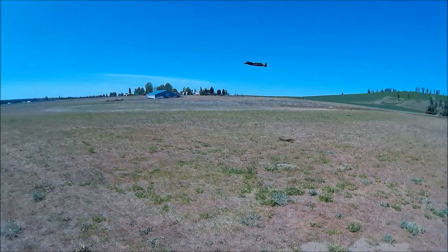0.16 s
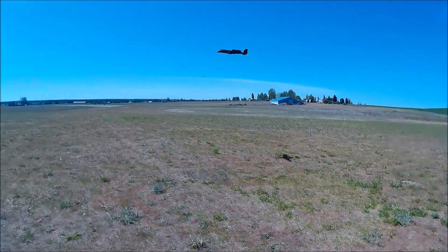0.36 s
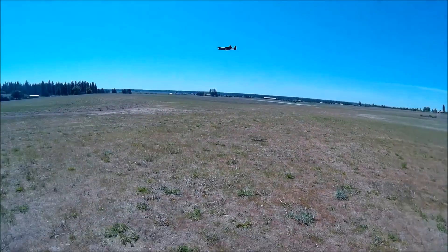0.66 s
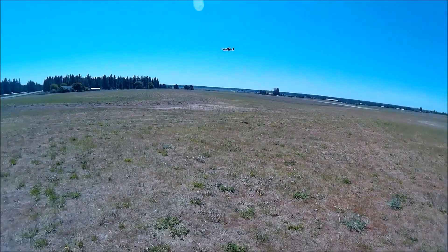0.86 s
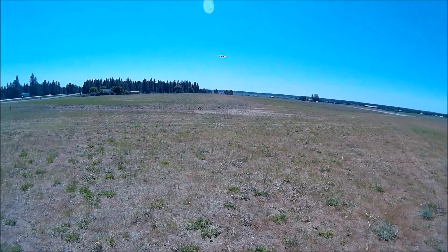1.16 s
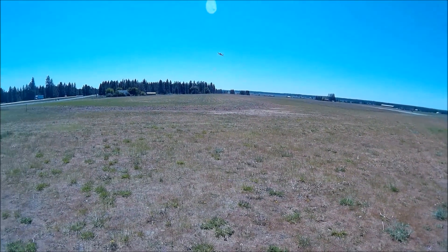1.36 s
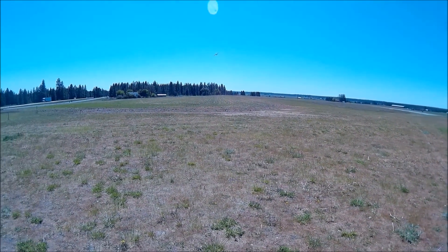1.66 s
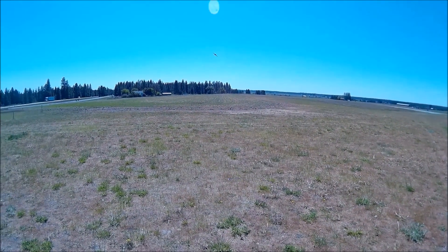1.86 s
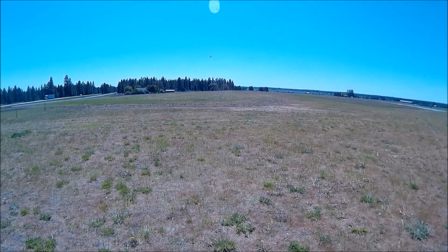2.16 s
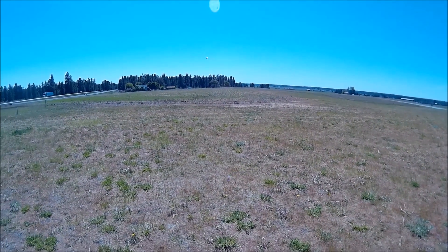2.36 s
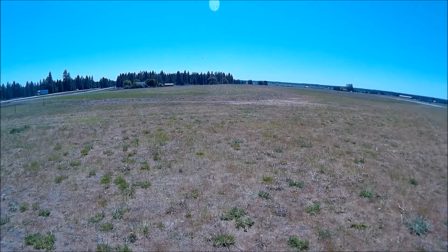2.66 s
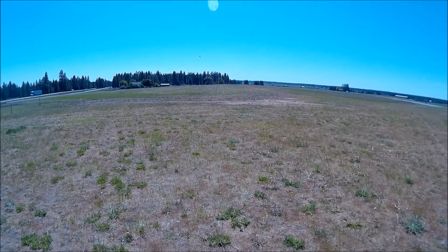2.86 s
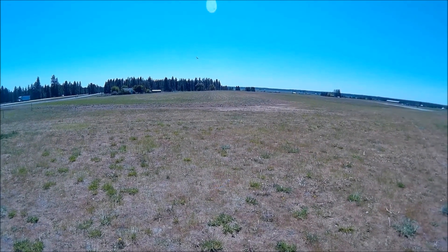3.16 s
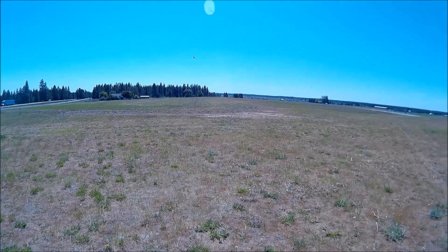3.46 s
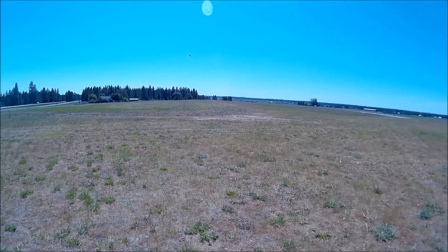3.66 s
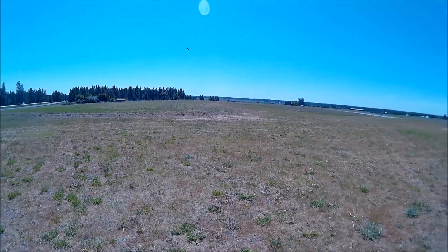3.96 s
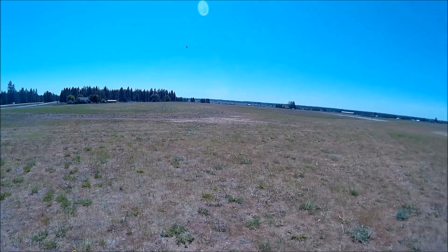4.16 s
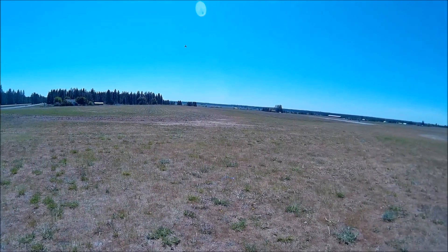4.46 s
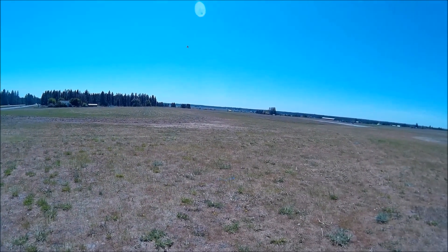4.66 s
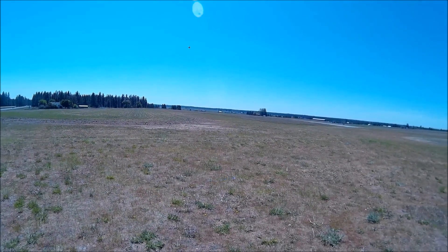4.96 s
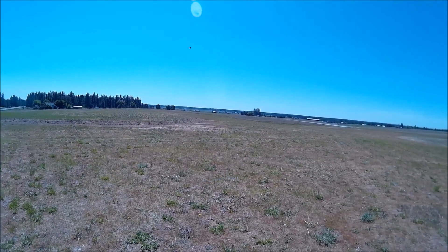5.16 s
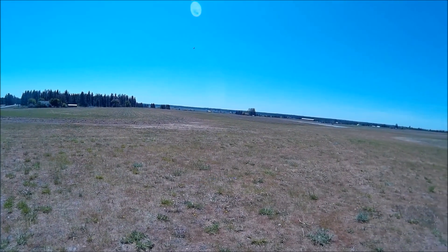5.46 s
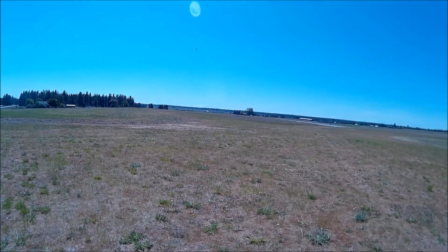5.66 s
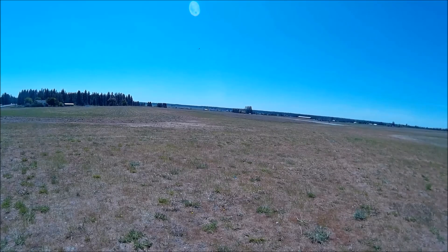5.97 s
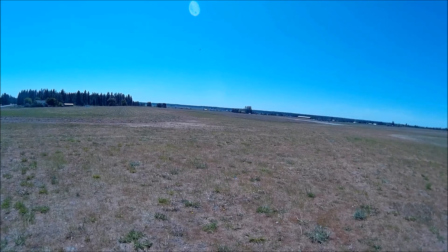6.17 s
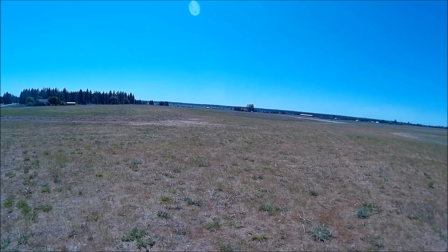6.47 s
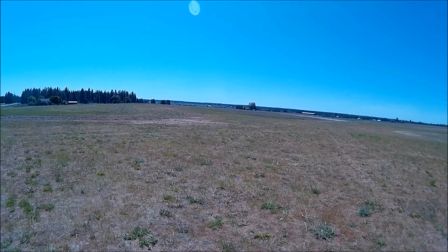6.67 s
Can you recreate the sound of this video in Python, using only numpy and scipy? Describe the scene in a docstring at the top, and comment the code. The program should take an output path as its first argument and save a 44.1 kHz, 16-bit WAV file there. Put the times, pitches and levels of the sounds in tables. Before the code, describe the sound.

Outdoors in an open field, a small microphone is battered by wind from the start. A model jet with two electric ducted fans is already near, passing closest at about 0.45 seconds: a throbbing mid-pitched hum, a thin high whine, and a rushing airy roar. Its pitch slides down as it passes, and it fades into the distance by roughly 2 seconds. Heavy low rumble and buffeting dominate until about 3.4, with dull pops, small crackles and brief hoots, especially from 0.7 to 3.3. The rumble then drops, nearly vanishing around 3.9 and again near 5, while unsteady, hollow whistles wander in pitch from 3.2 to 5. From 5.3 gusts swell again with crackles, pops and more broken whistling until 6.5, easing at the end. Soft recorder hiss with a faint, steady high whine continues throughout.

```python
"""Gusty wind rumbles and rushes on a small microphone as a model jet with two ducted fans
passes over an open field, its whine falling, and flies off.
Wind is banded noise under shared gusts; crackles and pops ring short modes; hoots and whistles are
shaken near-sines. The jet is Doppler-shifted tones and noise on a straight pass.
Under it all lie the recorder's hiss and its thin whine, a comb of steady-pitched lines."""
import sys
import numpy as np
from scipy import signal
from scipy.io import wavfile

SR = 44100
rng = np.random.default_rng(int(sys.argv[2]) if len(sys.argv) > 2 else 0)


def dump_mix(stems):
    """Bounce the given channels to the path in sys.argv[1] as a 16-bit WAV at rate SR."""
    frames = np.atleast_2d(stems).T  # one column per channel
    limited = np.clip(frames, -1, 1)  # hard clip at full scale
    pcm = np.round(limited * 32767).astype(np.int16)
    wavfile.write(sys.argv[1], SR, pcm)


N = 300321
TIME_S = np.arange(N) / SR


def from_db(db):
    """Amplitude gain of a level in dB."""
    return 10 ** (np.asarray(db) / 20)


def rms_one(x):
    """Scale a signal to rms 1."""
    return x / np.sqrt(np.mean(x ** 2) + 1e-20)


def in_time(rows):
    """Columns of a table after its times, drawn as lines with one value a sample."""
    start_s, *columns = np.transpose(rows)
    return [np.interp(TIME_S, start_s, column) for column in columns]


def fade(rows, edge_s):
    """Gain that opens around the first row and closes around the last."""
    to_nearest_end_s = np.minimum(TIME_S - rows[0][0], rows[-1][0] - TIME_S)
    return np.clip(to_nearest_end_s / edge_s + .5, 0, 1)


def drift(rate_hz):
    """Slow random wander of rms 1: noise twice through a one-pole low-pass, at a 20th of the sample rate."""
    pole = np.exp(-40 * np.pi * rate_hz / SR)
    noise = rng.standard_normal(N // 20 + 2002)
    slow = signal.lfilter([1], [1, -2 * pole, pole * pole], noise)[2000:]  # drop the settling
    return np.interp(np.arange(N) / 20, np.arange(len(slow)), rms_one(slow))


def tone(pitch_hz):
    """Sine of rms 1 on a fixed or moving pitch."""
    cycles = np.cumsum(pitch_hz * np.ones(N)) / SR
    return np.sqrt(2) * np.sin(2 * np.pi * (cycles + rng.random()))


def cut(x, corner_hz, kind, order):
    """Butterworth high- or low-pass."""
    return signal.sosfilt(signal.butter(order, corner_hz, kind, fs=SR, output="sos"), x)


def coloured(points, gusts_db, patchy_db, rate_hz):
    """Third-octave noise bands that share the gusts while each flickers on its own; rms 1."""
    band_hz, band_db = np.transpose(points)
    edges_hz = band_hz[0] * 2 ** np.arange(0, np.log2(band_hz[-1] / band_hz[0]) + .3, 1 / 3)
    white, out = rng.standard_normal((2, N)), 0
    for k, (low, high) in enumerate(zip(edges_hz, edges_hz[1:])):
        # neighbouring bands take different noises
        band_pass = signal.butter(2, [low, high], "band", fs=SR, output="sos")
        band = signal.sosfilt(band_pass, white[k % 2])
        level_db = np.interp(np.log(low * high) / 2, np.log(band_hz), band_db)
        out = out + band * from_db(level_db + gusts_db + patchy_db * drift(rate_hz))
    return rms_one(out)


# wind on the port, before its low and high cuts: start_s [s], rumble_db, heave_db, buffet_db [dB]
WIND_LEVELS = [(0, -17.5, -21.5, -24), (.21, -19, -20, -29.5), (.44, -21.5, -23.5, -26),
               (.62, -26.5, -30.5, -35.5), (1.06, -21, -22.5, -25), (1.16, -19, -22.5, -32.5),
               (1.75, -21.5, -18.5, -26.5), (2.1, -17.5, -16, -20.5), (2.45, -19.5, -20, -33.5),
               (2.62, -17.5, -17, -28), (2.8, -23, -21, -30), (3.1, -17.5, -17.5, -28.5),
               (3.42, -23.5, -24, -38), (3.52, -32.5, -27, -38.5), (3.72, -35.5, -27.5, -45.5),
               (3.86, -57, -38.5, -60), (4.01, -46, -36, -52), (4.15, -36.5, -27.5, -39.5),
               (4.65, -35.5, -32, -41.5), (4.95, -58, -32.5, -34.5), (5.12, -43.5, -35, -52),
               (5.2, -36, -31, -60), (5.32, -27, -28, -36), (5.46, -22.5, -27, -26.5),
               (5.65, -25.5, -28.5, -30.5), (5.9, -24.5, -29, -29), (6.13, -21, -26, -20.5),
               (6.32, -29.5, -21.5, -42.5), (6.5, -23, -27.5, -28.5), (6.81, -33.5, -32.5, -33.5)]
# rush of air past the housing, and treble hiss: start_s [s], rush_db, hiss_db [dB]
AIR_LEVELS = [(0, -36, -56), (.15, -34.5, -59), (.36, -35, -56.5), (.6, -36.5, -57), (.87, -36, -56),
              (1.1, -45, -61.5), (1.35, -46, -62.5), (2.05, -38, -61.5), (2.37, -47, -64),
              (3.07, -44.5, -62.5), (3.42, -46.5, -64), (3.52, -54.5, -66.5), (3.69, -49.5, -65),
              (3.8, -61, -70.5), (4.02, -56.5, -71), (4.2, -47.5, -65), (4.5, -40, -61.5),
              (4.95, -44.5, -63.5), (5.4, -37.5, -60), (6.03, -34.5, -58.5), (6.81, -34.5, -60.5)]
# noise colours of the wind, deep to bright: band_hz [Hz], level_db [dB per Hz]
HEAVE_COLOUR = [(20, -8), (35, -7.5), (60, -5.5), (95, -5.5), (130, -7.5), (180, -17.5)]
RUMBLE_COLOUR = [(60, -22), (100, -17.5), (150, -1), (250, -3), (350, -2.5), (450, -6), (560, -14),
                 (700, -31.5)]
BUFFET_COLOUR = [(250, -19), (400, -7.5), (520, 0.5), (650, 3), (800, -8.5), (1000, -18), (1400, -43)]
RUSH_COLOUR = [(400, -29.5), (700, 4.5), (1100, -2.5), (1500, -8.5), (2000, -7.5), (2400, -22), (3000, -20)]
PORT_LOW_HZ, PORT_HIGH_HZ = 28.6, 920   # edges of the pressure on the port


def wind():
    """Eddies press on the port: lumps that reach from the heaving up into the rush."""
    rumble_db, heave_db, buffet_db = in_time(WIND_LEVELS)
    rush_db = in_time(AIR_LEVELS)[0]
    lumps, flurry, gusts = drift(47), drift(93), drift(4.1)
    rumble = coloured(RUMBLE_COLOUR, 2.0 * lumps + 0.46 * gusts, patchy_db=1.5, rate_hz=45)
    buffet = coloured(BUFFET_COLOUR, 1.1 * lumps + 0.5 * flurry + 1.2 * gusts, patchy_db=1.5, rate_hz=15)
    rush = coloured(RUSH_COLOUR, 1.3 * lumps + 0.5 * flurry + .8 * gusts, patchy_db=1.6, rate_hz=14)
    heave = coloured(HEAVE_COLOUR, 1.0 * lumps, patchy_db=2.5, rate_hz=43)
    pressure = from_db(heave_db) * heave + from_db(rumble_db) * rumble + from_db(buffet_db) * buffet
    pressure = cut(pressure, PORT_LOW_HZ, "high", order=2)
    pressure = cut(pressure, PORT_HIGH_HZ, "low", order=3)
    return pressure + from_db(rush_db) * rush


# colour of the recorder's hiss: band_hz [Hz], level_db [dB per Hz]
HISS_COLOUR = [(1500, -23), (2500, 8.5), (4000, 3.5), (7000, 1.5), (9500, 3), (12000, 0), (16000, -1.5)]
# lines of the whine: place from the centre [buzz rates]
WHINE_PLACES = [-2, -1, 0, 1, 2, 2.5, 3, 4, 5]
# the same lines: level_db [dB relative to the hiss, before they follow it and waver]
WHINE_DB = [-27.5, -23, -17, -21.5, -24.5, -14.5, -18, -26, -26.5]
WHINE_HZ, BUZZ_HZ = 9337.6, 72.7   # centre of the comb and its spacing
WHINE_FOLLOWS = .5   # the whine swings this share further than the hiss, in dB


def electronics():
    """Smooth hiss with a comb of thin, wavering lines on it."""
    whine = 0
    for place, level_db in zip(WHINE_PLACES, WHINE_DB):
        whine = whine + from_db(level_db + 3.0 * drift(12)) * tone(WHINE_HZ + place * BUZZ_HZ)
    flutter_db = .8 * drift(16)
    hiss = coloured(HISS_COLOUR, flutter_db, patchy_db=.6, rate_hz=18)
    hiss_db = in_time(AIR_LEVELS)[1]
    follow_db = WHINE_FOLLOWS * (hiss_db - hiss_db.mean())
    return from_db(hiss_db) * (hiss + whine * from_db(follow_db))


BLADE_HZ, BLADES = 3367, 6   # blade pitch before the Doppler shift; blades on each fan
SPEED_M_S, SOUND_M_S = 30, 343
CLOSEST_M, CLOSEST_S = 9.5, .445   # nearest distance of the pass, and when
FALL_DB, OFF_AIM_DB = 6.5, 17.5   # loss per doubling of distance over grass; most lost outside a lobe


def flight():
    """Straight pass: blade pitch with its Doppler shift, distance, and angle from ahead of the jet."""
    gone_m = SPEED_M_S * (TIME_S - CLOSEST_S)
    distance_m = np.hypot(gone_m, CLOSEST_M)
    blade_hz = BLADE_HZ / (1 + SPEED_M_S / SOUND_M_S * gone_m / distance_m)
    angle_deg = np.degrees(np.arccos(-gone_m / distance_m))
    return blade_hz, distance_m, angle_deg


def lobe(level_db, aim_deg, width_deg):
    """Gain toward the listener: a beam aimed at an angle from ahead, weakened by distance."""
    _, distance_m, angle_deg = flight()
    off_aim_db = np.minimum(10 * ((angle_deg - aim_deg) / width_deg) ** 2, OFF_AIM_DB)
    return from_db(level_db - off_aim_db - FALL_DB * np.log2(distance_m / CLOSEST_M))


# the two shafts beat: rate, a moment when they add up, depth 0-1; and the pitch jitter as a share
BEAT_HZ, IN_STEP_S, BEAT_DEPTH, SHAFT_JITTER = 7, .26, 0.9, .003


def shaft():
    """Turning rate of the fans, one blade pitch divided by the blades, with a beating level."""
    shaft_hz = flight()[0] / BLADES * (1 + SHAFT_JITTER * drift(40))
    beat = 1 + BEAT_DEPTH * np.cos(2 * np.pi * BEAT_HZ * (TIME_S - IN_STEP_S))
    gain = lobe(level_db=-26, aim_deg=61, width_deg=64)
    return gain * beat * from_db(1.0 * drift(20)) * tone(shaft_hz)


# howling bands of the ducts: pitch [share of the blade pitch], level_db [dB within the howl]
DUCT_BANDS = [(.35, -3), (.44, -2), (.535, 0)]


def duct_howl():
    """Ducts howl in narrow bands: tones roughened by a random gain."""
    blade_hz = flight()[0]
    howl = sum(from_db(db) * drift(40) * tone(share * blade_hz) for share, db in DUCT_BANDS)
    return lobe(level_db=-46, aim_deg=95, width_deg=60) * howl


# fan tones on arrival, before shade and twinkle: start_s [s], blade_db, octave_db [dB]
FAN_TONES = [(0, -85, -72), (.05, -75, -62), (.1, -64, -63), (.16, -58, -60), (.26, -60, -60),
             (.35, -49, -64), (.43, -56, -58), (.52, -53, -58), (.6, -69, -66), (.7, -66, -71),
             (.8, -60, -66), (.9, -67, -71), (1.0, -78, -76), (1.08, -71, -75), (1.17, -81, -79),
             (1.3, -75, -79), (1.55, -81, -81), (1.75, -88, -90), (2.2, -100, -100)]
FAN_SPREAD = .0066   # the fans differ in speed by twice this share
# the fuselage shades the far fan until the jet is seen from behind
FAR_FAN_DB, UNSHADED_DEG, SHADE_EDGE_DEG = -12, 115, 8


def fan_blades():
    """Blades chop the air: each fan sounds its blade tone and the octave, each twinkling in level."""
    blade_hz, _, angle_deg = flight()
    shade_db = FAR_FAN_DB * np.clip((UNSHADED_DEG - angle_deg) / SHADE_EDGE_DEG, 0, 1)
    out = 0
    for side in (-1, 1):   # near fan, far fan
        fan_hz = blade_hz * (1 + side * FAN_SPREAD + 0.001 * drift(40))
        for order, level_db in enumerate(in_time(FAN_TONES), 1):
            twinkle_db = 2.2 * drift(14)
            out = out + from_db(level_db + (side > 0) * shade_db + twinkle_db) * tone(order * fan_hz)
    return out


# colours of the efflux's roar and its hiss: band_hz [Hz], level_db [dB per Hz]
ROAR_COLOUR = [(800, -9.5), (1100, 3.5), (1400, 0), (1800, -1.5), (2100, -9), (2400, -30.5)]
EFFLUX_COLOUR = [(1500, 9), (2500, 9.5), (4000, 3), (7000, 7.5), (10000, -19), (14000, -13)]


def efflux():
    """Turbulent air behind the fans: a roar and a brighter hiss, each with its own beam."""
    roar = coloured(ROAR_COLOUR, 0, patchy_db=-0.5, rate_hz=20)
    hiss = coloured(EFFLUX_COLOUR, .4 * drift(12), patchy_db=1.2, rate_hz=11)
    roar_gain = lobe(level_db=-39.5, aim_deg=75, width_deg=75)
    hiss_gain = lobe(level_db=-57, aim_deg=80, width_deg=120)
    return roar_gain * roar + hiss_gain * hiss


def jet():
    """The passing jet: shaft tone, duct howl, blade tones and efflux together."""
    return shaft() + duct_howl() + fan_blades() + efflux()


# sharp crackles of the gusts: start_s [s], click_db [dB, before the modes and softening]
CRACKLES = [(0.079, -8.5), (0.838, -17), (0.993, -13), (1.057, -8), (1.198, -12), (1.359, -6), (1.556, -10),
            (1.823, -10), (1.936, -10), (2.077, 1), (2.143, -18), (2.207, -4), (2.221, -7), (2.416, -21),
            (2.552, -10), (2.568, -6), (2.597, -7), (2.905, -4.5), (3.054, -7.5), (3.408, -17),
            (5.685, -10), (5.725, -9), (5.768, -9.5), (5.867, -5.5)]
# short modes of the housing: pitch_hz [Hz], level_db [dB], t60_s [s]
CRACKLE_MODES = [(648.5, -2, 0.028), (1020, -21.5, 0.0023), (1890, -25.5, 0.009)]
CRACKLE_SOFT_HZ = 1240   # a puff of air is no hard click
SMALL_PER_S = 80.0   # mean rate of the small crackles


def crackles():
    """Clicks ring the housing's short modes: placed ones, and small chance ones that swell with the rumble."""
    rumble_db = in_time(WIND_LEVELS)[0]
    chance_db = 2.4 * np.minimum(rng.exponential(1, N), 2)
    small = (rng.random(N) < SMALL_PER_S / SR) * from_db(rumble_db + chance_db)
    start_s, click_db = np.transpose(CRACKLES)
    out = 0
    for pitch_hz, level_db, t60_s in CRACKLE_MODES:
        clicks = small * from_db(2 * rng.standard_normal(N))
        clicks[np.round(start_s * SR).astype(int)] = from_db(click_db)
        # two-pole resonator; the tiny offset keeps its tail from going denormal
        pole, turn = from_db(-60 / (t60_s * SR)), 2 * np.pi * pitch_hz / SR
        feedback = [1, -2 * pole * np.cos(turn), pole * pole]
        out = out + from_db(level_db) * signal.lfilter([0, np.sin(turn)], feedback, clicks + 1e-18)
    return cut(out, CRACKLE_SOFT_HZ, "low", order=1)


def shed(spell, edge_s):
    """Vortices shed at the port's edge: a near sine whose pitch and strength shake with the turbulence."""
    pitch_hz, level_db, rough = in_time(spell)
    rough = np.clip(rough, 0, 1)
    steady = tone(pitch_hz * (1 + 0.0513 * rough * drift(24.9)))
    shaken = tone(pitch_hz * (1 + 0.044 * drift(14.0))) * drift(55)
    blend = np.sqrt(1 - rough ** 2) * steady + rough * shaken
    return fade(spell, edge_s) * from_db(level_db) * blend


# short hoots: start_s, length_s [s], first_hz, middle_hz, last_hz [Hz], level_db [dB]
HOOTS = [(0.585, 0.24, 344.7, 371.3, 392, -23), (1.088, 0.056, 400, 430, 483, -14.5),
         (1.38, 0.13, 296, 294, 320, -23), (4.927, 0.37, 640, 655, 640, -43),
         (6.088, 0.12, 691.6, 674, 698, -26.5), (6.458, 0.066, 660, 673, 723, -24.5)]
HOOT_EDGE_S, HOOT_ROUGH = 0.063, 0.694   # fade length; share of shaken tone 0-1


def hoots():
    """Short, rough vortex tones, each gliding through three pitches."""
    out = 0
    for start_s, length_s, *pitches_hz, level_db in HOOTS:
        glide = [(start_s + length_s * k / 2, pitch_hz, level_db, HOOT_ROUGH)
                 for k, pitch_hz in enumerate(pitches_hz)]
        out = out + shed(glide, HOOT_EDGE_S)
    return out


# pressure pops on the port: start_s [s], level_db [dB at the start of the decay], ring_hz [Hz], t60_s [s]
POPS = [(0.754, -4.5, 400, 0.057), (1.021, -2.5, 245, 0.026), (1.097, -2, 404, 0.046),
        (1.23, -2.5, 358, 0.048), (1.299, -10, 75, 0.11), (1.317, -4, 423, 0.047), (1.368, -1.5, 307, 0.05),
        (1.506, -6.5, 282, 0.071), (2.289, -0.5, 463, 0.051), (2.412, -3.5, 327, 0.024),
        (2.7, 4, 504, 0.025), (2.721, -4, 362, 0.058), (2.823, -10.5, 363, 0.12), (3.118, 1, 190, 0.013),
        (3.306, -8.5, 461, 0.072), (4.624, -8.5, 203.3, 0.026), (5.571, -3, 442, 0.08),
        (5.742, -5, 304, 0.039), (5.951, -7, 316, 0.12)]
POP_ATTACK_S = 0.0031


def pops():
    """A sudden pressure step rings the port's cavity: a decaying sine with a soft attack."""
    out, ring_s = np.zeros(N + SR), np.arange(SR // 5) / SR
    attack = np.sin(np.pi / 2 * np.minimum(ring_s / POP_ATTACK_S, 1)) ** 2
    for start_s, level_db, ring_hz, t60_s in POPS:
        decay = from_db(level_db - 60 * ring_s / max(t60_s, .005))
        at = round(start_s * SR)
        out[at:at + len(ring_s)] += decay * attack * np.sin(2 * np.pi * ring_hz * ring_s)
    return out[:N]


# spells of whistling, one table each: start_s [s], pitch_hz [Hz], level_db [dB], rough [share shaken, 0-1]
WHISTLES = [
    [(3.24, 464.7, -19, 0.64), (3.282, 505, -17, 0.82), (3.3, 517, -28, 0.55), (3.318, 523, -18, 0.5),
     (3.326, 506, -23, 0.6), (3.336, 491.4, -16, 0.54), (3.392, 501.4, -14, 0.64), (3.4, 570, -20, 0.52),
     (3.41, 572, -14.5, 0.49), (3.448, 528.4, -13.5, 0.68), (3.466, 517, -8.5, 0.38),
     (3.478, 474.6, -11.5, 0.52), (3.538, 481, -20.5, 0.59), (3.57, 451, -30.5, 0.57)],
    [(3.57, 471, -20, 0.33), (3.586, 489.3, -19, 0.61), (3.682, 530, -15, 0.43), (3.69, 520.4, -12.5, 0.3),
     (3.88, 487, -16, 0.21), (4.0, 505, -14, 0.29), (4.026, 505, -17, 0.1), (4.054, 470, -16.5, 0.4),
     (4.076, 432, -33.5, 0.31), (4.1, 453.6, -20.5, 0.27), (4.112, 493, -25, 0.38),
     (4.142, 486, -16.5, 0.37), (4.162, 457, -17.5, 0.3), (4.188, 453.2, -13, 0.07),
     (4.204, 428, -33.5, 0.24), (4.216, 447.3, -18.5, 0.42), (4.282, 476.6, -24, 0.35),
     (4.292, 467, -38, 0.29), (4.308, 467, -17, 0.17), (4.336, 429.8, -15.5, 0.27), (4.4, 416, -22.5, 0.32),
     (4.428, 420, -16.5, 0.29), (4.444, 414, -29, 0.3), (4.482, 384, -13, 0.48), (4.502, 378, -30, 0.38),
     (4.556, 410, -9.5, 0.29), (4.598, 388.3, -32.5, 0.22), (4.636, 420, -16.5, 0.48),
     (4.668, 383.5, -13.5, 0.21), (4.722, 385.4, -18.5, 0.14), (4.756, 450, -10, 0.12),
     (4.798, 454, -16.5, 0.25), (4.818, 456.3, -24.5, 0.32), (4.83, 402, -15.5, 0.14),
     (4.84, 394.8, -23.5, 0.34), (4.926, 396.4, -27.5, 0.34), (4.942, 383, -16.5, 0.2),
     (4.976, 386.6, -19, 0.25), (5.01, 333, -24.5, 0.57), (5.028, 319, -29, 0.5)],
    [(5.316, 361, -37, 0.2), (5.34, 393, -20.5, 0.44), (5.398, 388.7, -20, 0.13), (5.428, 473, -16, 0.5),
     (5.436, 490, -31, 0.4), (5.454, 455.4, -11.5, 0.28), (5.53, 454, -32, 0.43), (5.546, 424, -13.5, 0.39),
     (5.56, 418, -22.5, 0.7), (5.576, 432.4, -8.5, 0.25), (5.63, 380, -39, 0.43)],
    [(6.07, 436, -24, 0.47), (6.104, 410, -23, 0.36), (6.13, 409, -20, 0.3), (6.146, 496, -19.5, 0.5),
     (6.164, 481, -29, 0.43), (6.19, 430, -22.5, 0.33), (6.232, 425.3, -13, 0.78), (6.262, 477, -13, 0.46),
     (6.292, 404, -26.5, 0.5), (6.332, 450, -12.5, 0.61), (6.37, 414, -20, 0.6), (6.412, 410, -31, 0.6),
     (6.436, 420, -18, 0.4), (6.456, 430.5, -40, 0.5), (6.478, 432.4, -15.5, 0.26), (6.5, 411, -32, 0.5)],
]


def whistles():
    """Longer spells of wind whistling in the port, wandering in pitch and level."""
    return sum(shed(spell, edge_s=0.031) for spell in WHISTLES)


PEAK_LIMIT = .88   # highest level allowed to the wind, before its top is dulled
HOUSING_HZ = 2310   # top of all that the wind makes


def scene():
    """Everything at one microphone; the wind's rare highest peaks are limited and its top dulled."""
    pressure = wind() + crackles() + hoots() + pops() + whistles()
    limited = np.clip(pressure, -PEAK_LIMIT, PEAK_LIMIT)
    blown = cut(limited, HOUSING_HZ, "low", order=14)
    return (blown + jet() + electronics())[None]


CUTOFF_HZ = 15680


def record(dry):
    """The top is cut steeply, by an elliptic low-pass."""
    steep = signal.ellip(12, .5, 70, CUTOFF_HZ, fs=SR, output="sos")   # .5 dB ripple, 70 dB stop
    return signal.sosfilt(steep, dry)


dry = scene()
out = record(dry)
dump_mix(out)
```